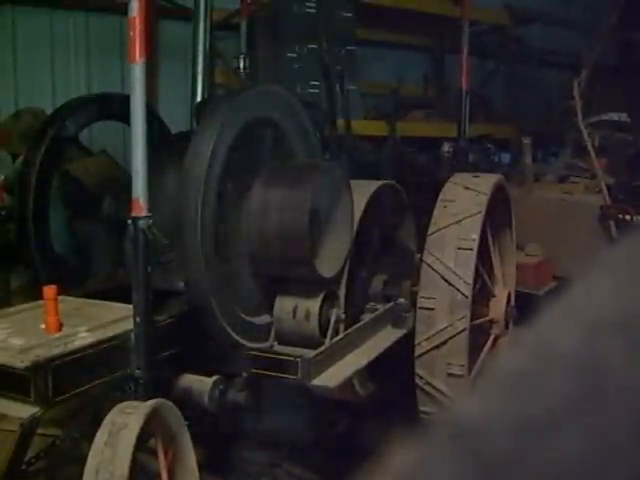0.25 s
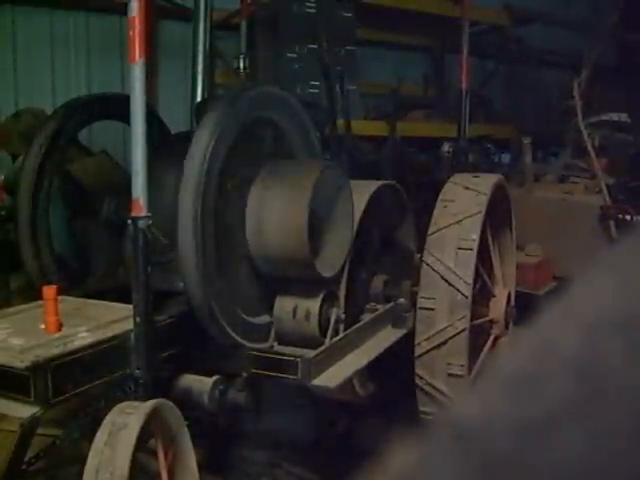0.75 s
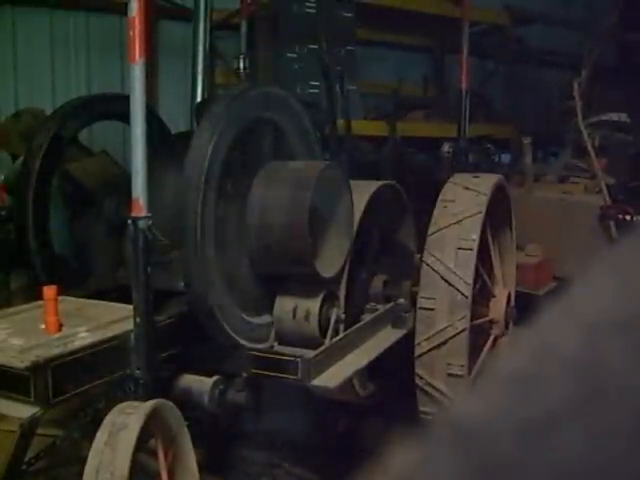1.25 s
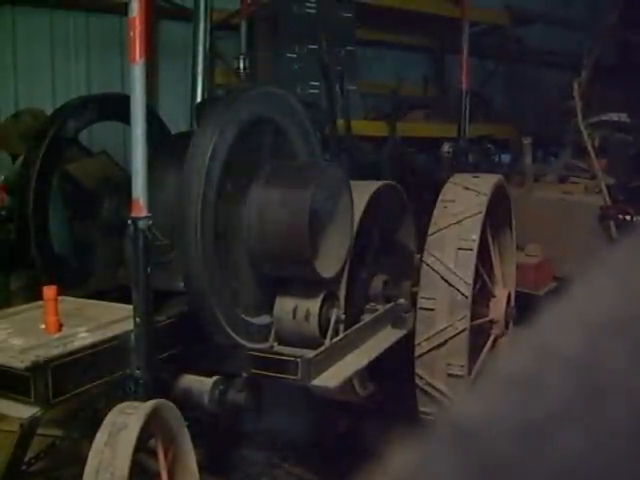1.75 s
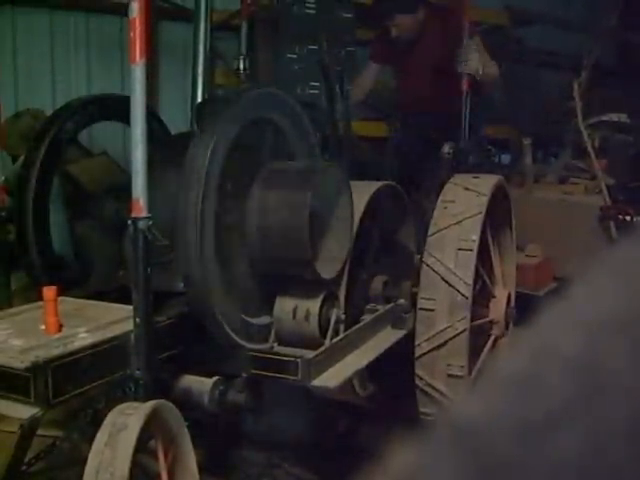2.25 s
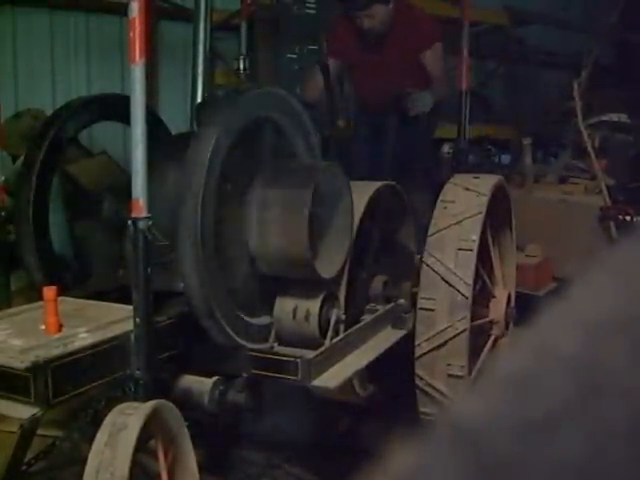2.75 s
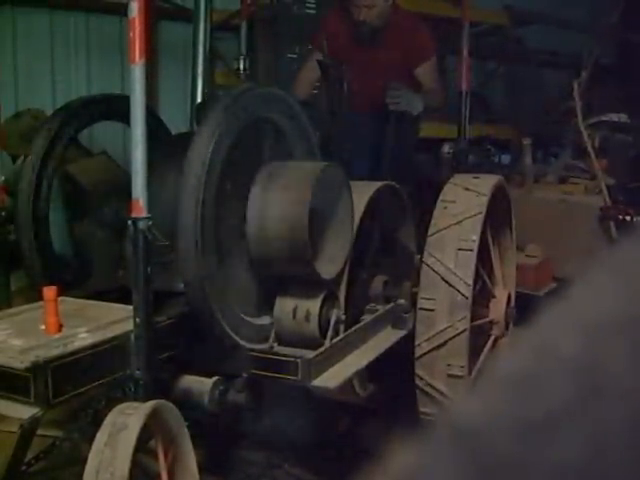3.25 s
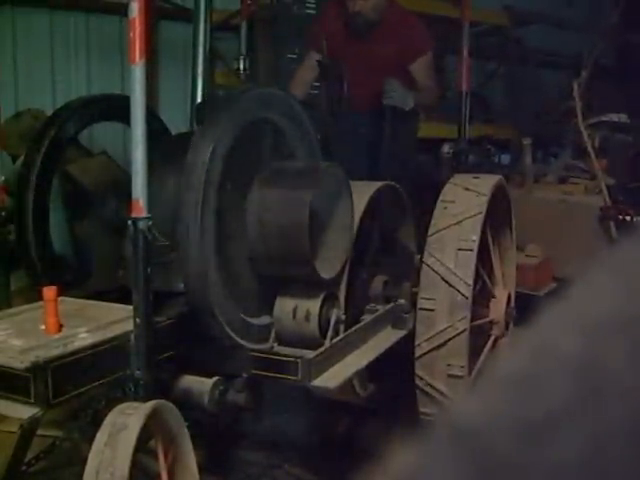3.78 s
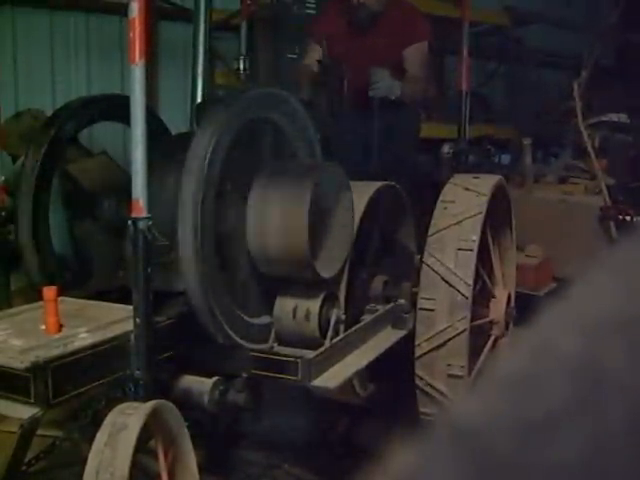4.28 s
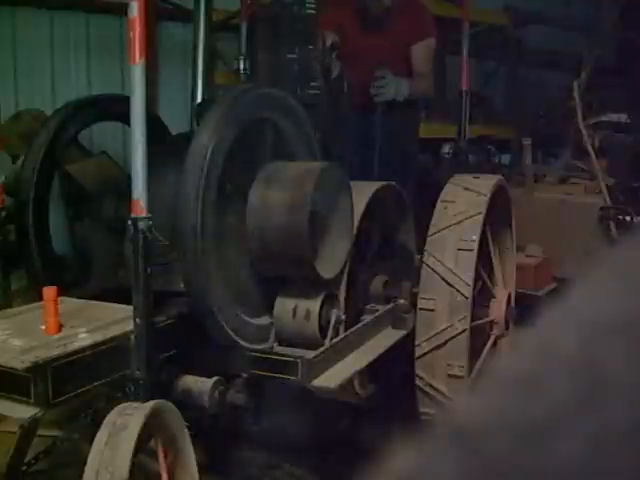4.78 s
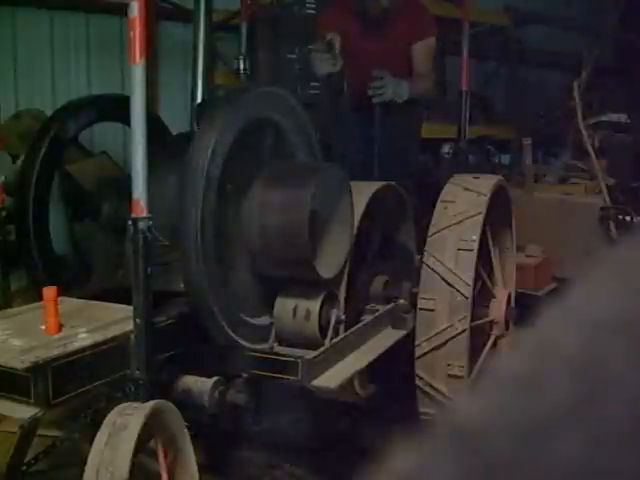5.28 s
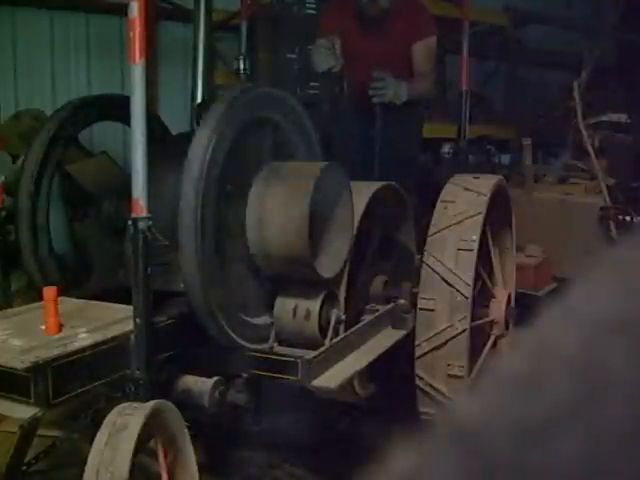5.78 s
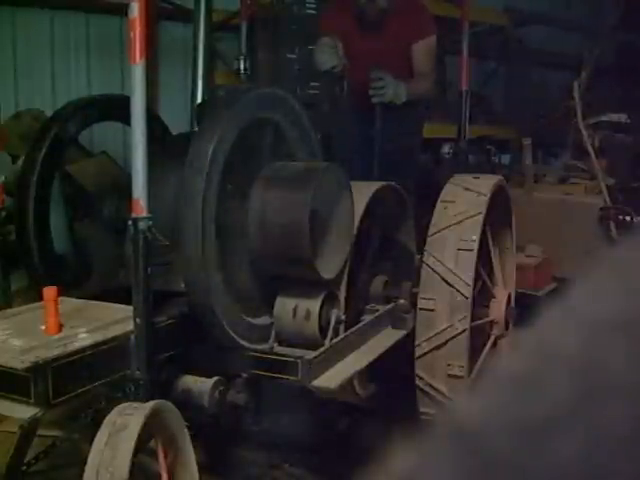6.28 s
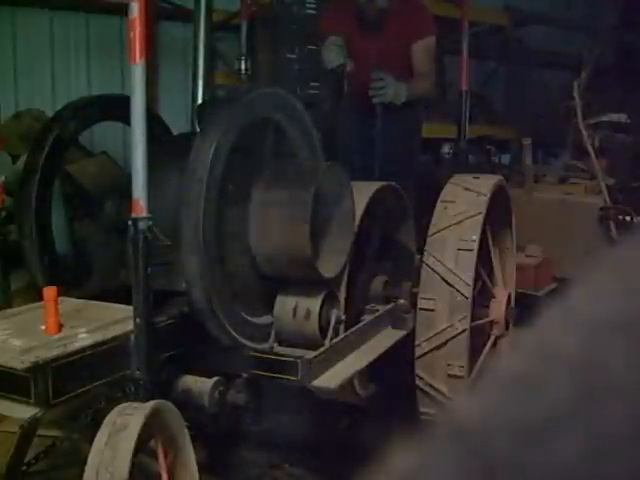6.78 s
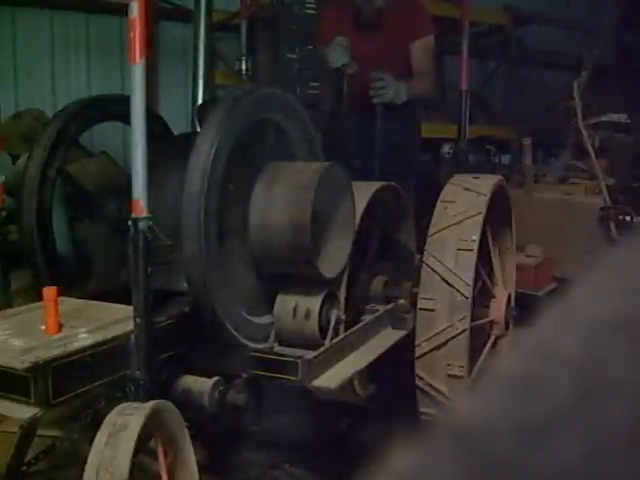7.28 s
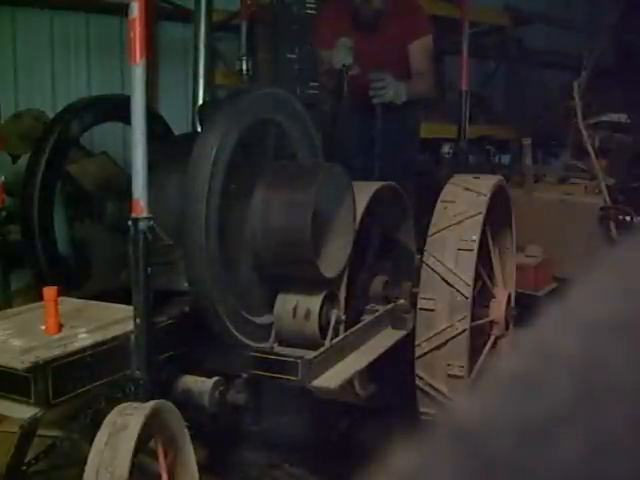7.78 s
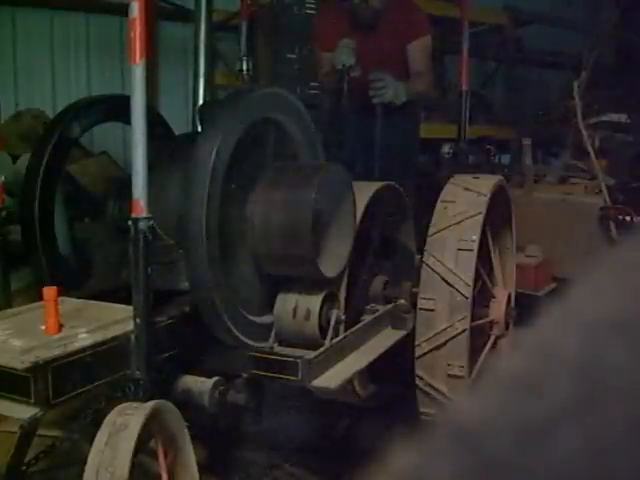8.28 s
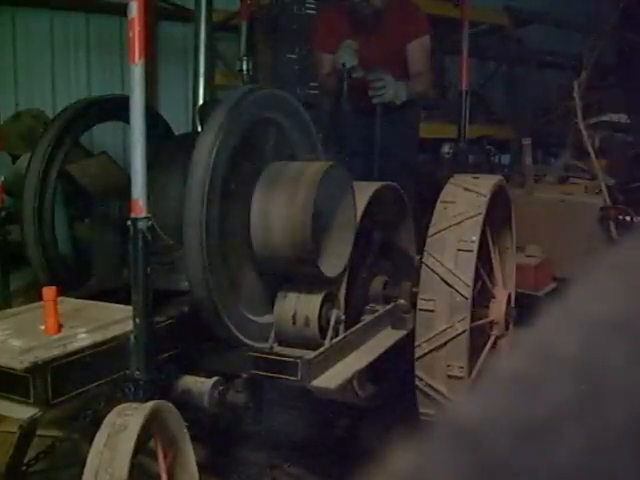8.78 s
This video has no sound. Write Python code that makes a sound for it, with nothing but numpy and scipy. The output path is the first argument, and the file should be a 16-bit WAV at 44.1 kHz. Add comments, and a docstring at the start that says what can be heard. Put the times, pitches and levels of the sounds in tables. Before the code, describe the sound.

Steady idle of an old flywheel engine: a hard, bright exhaust pop rings the metal walls, then a rattling clack, ticking rods, a soft chuff, brief gear groans and another clack just before the next pop. Three extra-hard metal knocks stand out. Continuous bearing rub and light jingle sit underneath. Single fixed mono perspective, close dense reflections, a half-second tail, softened top treble.

```python
"""In a sheet-metal shed an antique single-cylinder engine idles, firing about 80 times a minute.
Each firing is a low thump, a bark and a bright crack: noise bursts that ring the exhaust and the shed.
Between firings filtered noise makes the clack of each turn, linkage ticks, intake chuffs and knocks;
gliding sines with a drifting phase hum as gears, over random jingles, steady rubbing and a faint low hum."""
import sys
import numpy as np
from scipy import signal
from scipy.fft import rfft, irfft
from scipy.io import wavfile
from scipy.ndimage import uniform_filter1d

SR = 44100
rng = np.random.default_rng(int(sys.argv[2]) if len(sys.argv) > 2 else 0)


def master_out(mix):
    """Clip the mix to full scale and print it as 16-bit PCM to the path in sys.argv[1]."""
    frames = np.transpose(np.atleast_2d(mix))
    ceiling = np.clip(frames, -1, 1)
    pcm = np.round(ceiling * 32767).astype(np.int16)
    wavfile.write(sys.argv[1], SR, pcm)


N = 398663
T = np.arange(SR) / SR  # one second

# Firings. Each row: start in seconds, bark level in dB, crack level in dB,
# centre of the lifted bark band in Hz, centre of the lifted crack band in Hz.
FIRINGS = [(0.54, -27, -22, 990, 3640), (1.288, -29.5, -22.5, 1890, 3540), (1.94, -30, -21, 590, 3280),
           (2.685, -24.5, -20, 1130, 3040), (3.455, -27.5, -18.5, 816, 2570),
           (4.235, -27.5, -19.5, 1106, 2980), (5.003, -25.5, -21.5, 1700, 2800),
           (5.765, -25.5, -21, 1368, 2290), (6.524, -27.5, -21, 1420, 2530),
           (7.291, -28, -21.5, 1060, 2260), (8.057, -25.5, -18, 1700, 2805), (8.843, -28, -21, 1890, 3030)]
# Spectrum of struck metal. Each row: frequency in Hz, gain in dB.
METAL_SPECTRUM = [(60, -80), (400, -22.5), (800, -18.5), (1050, -18), (1400, -12.5), (1900, -6.5),
                  (2500, -5), (3100, -1), (3600, -3), (4200, -12.5), (5500, -25), (7500, -33.5),
                  (11000, -41.5)]
# Spectrum of the dry joint and loose fittings. Each row: frequency in Hz, gain in dB.
CHIRP_SPECTRUM = [(300, -30), (1500, -12), (2400, -10.5), (2850, -3.5), (3120, 6), (3450, -10), (4200, -19),
                  (5600, -22), (7500, -38.5), (11000, -43.5)]
# The flywheel turns twice in a cycle. Each entry: clack position as a share of the cycle after the firing.
CLACK_SHARES = (.351, .855)
CYCLE_S, SHORTEST_CYCLE_S = 0.764, 0.747


def amp(db):
    """Decibels to gain."""
    return 10 ** (np.asarray(db) / 20)


def unit(x):
    """Scales to energy 1."""
    return x / np.sqrt(np.sum(x ** 2) + 1e-20)


def read(points, hz):
    """Joins the points by straight lines on a log-frequency axis."""
    f, value = np.transpose(points)
    return np.interp(np.log(hz + 1), np.log(f), value)


def add(mix, start_s, sound):
    """Mixes a sound in at start_s, trimmed to the ends of the mix."""
    start = round(start_s * SR)
    sound = sound[max(-start, 0):]
    part = mix[max(start, 0):][:len(sound)]
    part += sound[:len(part)]


def at_level(x, db, first_ms):
    """Scales x so that its first milliseconds have the given rms level."""
    rms = np.sqrt(np.mean(x[:first_ms * SR // 1000] ** 2) + 1e-20)
    return amp(db) * x / rms


def through(x, response):
    """One second of x heard through an impulse response."""
    return signal.fftconvolve(x, response)[:SR]


def colour(points, size=8192):
    """Minimum-phase impulse response with the given spectrum."""
    hz = abs(np.fft.fftfreq(size, 1 / SR))
    log_gain = np.log(amp(read(points, hz)))
    spectrum = np.exp(np.conj(signal.hilbert(log_gain)))
    return np.fft.ifft(spectrum).real[:size // 2]


def emphasise(x, hz, width_hz, db):
    """Lifts one band by a resonance."""
    b, a = signal.iirpeak(hz, hz / width_hz, fs=SR)
    return x + (amp(db) - 1) * signal.lfilter(b, a, x)


def burst(rise_s, fall_s):
    """A puff of noise that swells and dies exponentially."""
    t = T[:SR // 4]
    envelope = (1 - np.exp(-t / rise_s)) * np.exp(-t / fall_s)
    return unit(rng.standard_normal(len(t)) * envelope)


def ring(modes, t60_s):
    """Dying sines of random phase, one for each mode."""
    total = 0
    for hz, db in modes:
        total = total + amp(db - 60 * T / t60_s) * np.sin(2 * np.pi * (hz * T + rng.random()))
    return unit(total)


def reflections(per_s, early_s):
    """Sparse random reflections from nearby surfaces, fading around early_s."""
    sparse = rng.standard_normal(SR) * (rng.random(SR) < per_s / SR)
    return sparse * np.exp(-(T / early_s) ** 4)


def decay(t60_s):
    """Exponential envelope, down 60 dB at t60_s."""
    return np.exp(-np.log(1000) * T / t60_s)


def shed(direct_db, early_db, early_s):
    """Direct sound, a dense cluster of reflections from nearby walls, and the diffuse tail."""
    # Ring time of the shed. Each row: frequency in Hz, t60 in seconds.
    ring_times = [(60, 0.6), (1200, 0.61), (3500, 0.55), (11000, 0.21)]
    hz = np.fft.rfftfreq(SR, 1 / SR)
    noise = rfft(rng.standard_normal(SR))
    band = read([(row[0], k) for k, row in enumerate(ring_times)], hz)
    tail = np.zeros(SR)
    for k, (_, t60_s) in enumerate(ring_times):
        share = np.maximum(1 - abs(band - k), 0)  # neighbouring bands crossfade
        tail += irfft(noise * share, SR) * decay(t60_s)
    early = reflections(6000, early_s)
    response = unit(tail * (1 - np.exp(-T / 0.0083))) + amp(early_db) * unit(early)
    response[0] += amp(direct_db)
    return unit(response)


def scatter(rise_s, early_db, early_s, t60_s):
    """A blow or a jet of gas, scattered afresh by nearby surfaces and then by the whole shed."""
    near = reflections(8000, early_s)
    far = rng.standard_normal(SR) * decay(t60_s)
    return unit((amp(early_db) * unit(near) + unit(far)) * (1 - np.exp(-T / rise_s)))


def cycles():
    """(start s, length s, next firing s) of each cycle, which ends at the next firing."""
    fired = [row[0] for row in FIRINGS]
    edges = [fired[0] - CYCLE_S] + fired + [fired[-1] + CYCLE_S]
    return [(s, max(end - s, SHORTEST_CYCLE_S), end) for s, end in zip(edges, edges[1:])]


def in_each_cycle(delay_s, share=0):
    """The moments at which the cam passes a share plus a delay, which stretches with the cycle."""
    moments = [(s + length * (share + delay_s / CYCLE_S), end) for s, length, end in cycles()]
    return [s for s, end in moments if s < end]  # sounds due after the next firing are left out


def in_each_turn(delay_s):
    """The moments a given delay after the clack, in every turn of the flywheel."""
    return [s for share in CLACK_SHARES for s in in_each_cycle(delay_s, share)]


def exhaust():
    """The valve opens: the same pressure step each time, then a jet of gas that is never twice alike."""
    # Ringing modes of the exhaust. Each row: frequency in Hz, relative level in dB.
    pipe_modes = [(662, -4), (780, -6), (855, -5), (964, -3), (1017, -4), (1105, 2), (1179, -1), (1308, -1),
                  (1545, -3), (1680, -2), (1801, 0), (2138, -3), (2260, -2), (2485, 0), (2659, 0),
                  (2805, -3), (2909, -1), (3055, -2), (3435, -2), (3533, -3)]
    # Spectra of thump, bark and crack. Each row: frequency in Hz, gain in dB.
    thump_spectrum = [(15, -24), (36, 1.5), (55, -8), (80, -5.5), (110, -6), (150, -0.5), (205, 4),
                      (300, 2), (500, -3), (1000, -18), (3000, -76)]
    bark_spectrum = [(60, -32), (200, -25), (450, -7), (650, -0.5), (850, -1.5), (1150, -0.5), (1500, -1),
                     (1900, -9.5), (2600, -29), (6000, -40)]
    crack_spectrum = [(200, -31.5), (1200, -32.5), (1900, -6), (2500, -4), (3000, 0.5), (3450, -3),
                      (4000, -8), (5000, -13.5), (6300, -25.5), (7500, -33), (11000, -37)]
    out, low, high = np.zeros(N), colour(bark_spectrum), colour(crack_spectrum)
    thump = through(colour(thump_spectrum), shed(direct_db=-2.5, early_db=-3, early_s=0.036))
    pipe = ring(pipe_modes, t60_s=0.39) * (1 - np.exp(-T / 0.0055))
    no_treble = signal.butter(6, 3600, fs=SR, output="sos")
    trim_db = -0.1  # bark and crack
    usual_db = np.mean([row[1] for row in FIRINGS])
    for s, bark_db, crack_db, bark_hz, crack_hz in FIRINGS:
        thump_db = -40.5 + 0.5 * (bark_db - usual_db)
        add(out, s, at_level(thump, thump_db, first_ms=100))
        # each bark is fresh noise with its own emphasised band
        space = shed(direct_db=-8, early_db=2, early_s=0.053) + amp(-12.5) * pipe
        gust = unit(through(burst(rise_s=0.0017, fall_s=0.0079), space))
        roar = scatter(rise_s=0.006, early_db=1, early_s=0.045, t60_s=0.55) + amp(-10.5) * pipe
        bark = emphasise(through(gust + 0.35 * roar, low), bark_hz, width_hz=220, db=4.5)
        add(out, s + 0.002007, at_level(bark, bark_db + trim_db, first_ms=100))
        # crack: the jet hisses over the whole treble and rings the metal lower down
        space = shed(direct_db=-5, early_db=0, early_s=0.056) + amp(-14) * pipe
        rung = unit(through(burst(rise_s=0.00035, fall_s=0.01), space))
        ringing = signal.sosfilt(no_treble, rung)
        jet = scatter(rise_s=0.003, early_db=3.5, early_s=0.07, t60_s=1.0)
        crack = emphasise(through(jet + 1.8 * ringing, high), crack_hz, width_hz=250, db=4)
        add(out, s + 0.0055, at_level(crack, crack_db + trim_db, first_ms=100))
    return out


def clacks():
    """Slack is taken up once a revolution: the same blow rings the iron, with a little loose rattle."""
    # Ringing modes of the iron works. Each row: frequency in Hz, relative level in dB.
    iron_modes = [(1060, -2), (1300, -3), (1480, 2), (1927, -3), (2035, -3), (2487, -3), (3052, 0),
                  (3435, -4), (3704, -6), (4371, -8)]
    mean_db, spread_db = -28.5, 0.37
    out, metal = np.zeros(N), colour(METAL_SPECTRUM)
    iron = ring(iron_modes, t60_s=0.5)
    body = shed(direct_db=-5.5, early_db=3.5, early_s=0.038) + amp(-11.5) * iron
    for s in in_each_turn(0):
        rattle = amp(-3) * scatter(rise_s=0.0018, early_db=2, early_s=0.031, t60_s=0.36)
        level_db = mean_db + spread_db * rng.standard_normal()
        add(out, s, at_level(through(body + rattle, metal), level_db, first_ms=50))
    return out


def knocks():
    """Now and then metal meets metal hard: a snap of a few milliseconds and its reflections."""
    # Hard knocks. Each row: start in seconds, level in dB.
    hard_knocks = [(1.95, -21), (5.355, -26.5), (8.061, -24)]
    out, metal = np.zeros(N), colour(METAL_SPECTRUM)
    for s, db in hard_knocks:
        knock = amp(4) * scatter(rise_s=0.0016, early_db=3, early_s=0.025, t60_s=0.3)
        add(knock, 0, burst(rise_s=0.00024, fall_s=0.00083))
        knock = emphasise(through(knock, metal), 3130, width_hz=320, db=7)
        add(out, s, at_level(knock, db, first_ms=4))
    return out


def linkage():
    """A dry joint chirps soon after each clack; rods and rocker tap at fixed points of the turn."""
    # Taps in every turn. Each row: delay after the clack in seconds at CYCLE_S, mean level in dB.
    taps = [(.056, -41), (0.157, -52.5), (.198, -41.5), (.306, -36)]
    # Spectrum of a tapped rod. Each row: frequency in Hz, gain in dB.
    tap_spectrum = [(200, -38), (1200, -15), (2000, -8), (2500, -2.5), (3050, 0), (3600, -3), (4300, -13),
                    (5700, -22.5), (7500, -34.5), (11000, -36.5)]
    chirp_delay_s, chirp_db, chirp_spread_db = 0.097, -35.5, 1.9
    out, joint, rod = np.zeros(N), colour(CHIRP_SPECTRUM), colour(tap_spectrum)
    for s in in_each_turn(chirp_delay_s):
        chirp = through(scatter(rise_s=0.0047, early_db=-3, early_s=0.03, t60_s=0.13), joint)
        level_db = chirp_db + chirp_spread_db * rng.standard_normal()
        add(out, s, at_level(chirp, level_db, first_ms=40))
    for delay_s, db in taps:
        for s in in_each_turn(delay_s):
            tap = through(scatter(rise_s=0.0011, early_db=3, early_s=0.02, t60_s=0.44), rod)
            add(out, s, at_level(tap, db + rng.uniform(-1, 1), first_ms=30))
    return out


def intake():
    """A soft, low chuff of coloured noise about half a cycle after each firing."""
    # Spectrum of the chuff. Each row: frequency in Hz, gain in dB.
    chuff_spectrum = [(15, -2), (36, 0), (80, -11), (200, 2), (420, 1), (660, 3), (950, 3.5), (1500, -17),
                      (4000, -59)]
    out, low = np.zeros(N), colour(chuff_spectrum)
    chuff = through(low, shed(direct_db=-5, early_db=-1.5, early_s=0.036))
    for s in in_each_cycle(0.376):
        air = through(low, scatter(rise_s=0.0017, early_db=-3, early_s=0.23, t60_s=0.91))
        add(out, s, at_level(chuff + amp(-6) * air, -49, first_ms=100))
    return out


def hums():
    """Short fuzzy tones glide, swell and fade as the load on the gears changes round the cycle."""
    # Gear and intake tones of every cycle. Each row: delay after the firing in seconds at CYCLE_S,
    # length in seconds, start frequency in Hz, end frequency in Hz, width in Hz,
    # level in dB ahead of random spread, swell and shed.
    tones = [(.209, .074, 290, 268, 60, -56), (.371, 0.034, 520, 640, 40, -48.5),
             (.384, 0.073, 425, 400, 60, -50), (.433, 0.042, 279, 255, 40, -48.5),
             (.507, 0.1248, 707, 767, 54, -52.5), (.51, 0.13, 865, 845, 65, -53),
             (.593, .055, 385, 440, 47, -53), (.592, 0.025, 253, 262, 42, -53.5),
             (.52, .1, 3892, 3830, 200, -50.5), (.514, 0.1, 5150, 5200, 300, -63)]
    out = np.zeros(N)
    for delay_s, length_s, start_hz, end_hz, width_hz, db in tones:
        t = T[:int(length_s * SR)]
        turns = np.cumsum(np.linspace(start_hz, end_hz, len(t))) / SR
        swell = np.sin(np.pi * t / length_s)
        for s in in_each_cycle(delay_s):
            # a random walk of the phase widens the tone
            walk = np.cumsum(rng.standard_normal(SR // 4))[:len(t)]
            drift = walk * np.sqrt(2 * np.pi * width_hz / SR)
            tone = np.sin(2 * np.pi * turns + uniform_filter1d(drift, SR // 1000))
            gain = amp(db + rng.uniform(-3.0, 2.6)) * np.sqrt(2)
            add(out, s, gain * tone * swell)
    return signal.fftconvolve(out, shed(direct_db=14, early_db=5.5, early_s=0.023))[:N]


def loose_parts():
    """Loose fittings jingle at random, about 40 hits a second, mostly faintly."""
    sizes = amp(4 * np.minimum(rng.exponential(1, N), 3)) * rng.choice([-1, 1], N)
    hits = sizes * (rng.random(N) < 40 / SR)
    body = through(colour(CHIRP_SPECTRUM), shed(direct_db=-11, early_db=12.5, early_s=0.012))
    return amp(-47) * unit(signal.fftconvolve(hits, body)[:N]) * np.sqrt(N)


def running():
    """Steady rubbing of bearings and gears: coloured noise of slightly uneven level."""
    # Spectrum of the rubbing. Each row: frequency in Hz, gain in dB.
    rubbing_spectrum = [(15, -69), (25, -24), (81, -36.5), (254, -9), (327, -42), (433, -8), (480, -12.5),
                        (862, -10), (1170, -10.5), (1630, -11), (2100, -5), (2330, -8.5), (3000, 3.5),
                        (4630, -29), (11000, -43), (14300, -83), (22000, -120)]
    gain = amp(read(rubbing_spectrum, np.fft.rfftfreq(N, 1 / SR)))
    noise = irfft(rfft(rng.standard_normal(N)) * gain, N)
    flutter = unit(uniform_filter1d(rng.standard_normal(N), SR // 60)) * np.sqrt(N)
    level_db = -42 + 2.24 * flutter
    return amp(level_db) * unit(noise) * np.sqrt(N)


def drone():
    """A faint, steady low hum in the shed: one sine."""
    return amp(-68.5) * np.sin(2 * np.pi * 125.5 * np.arange(N) / SR)


def scene():
    """All parts of the engine and the drone, heard from one spot."""
    works = clacks() + knocks() + linkage() + loose_parts() + hums() + running()
    return (exhaust() + intake() + works + drone())[None]


def record(dry):
    """Band limit: a linear-phase low-pass removes the top treble."""
    edge_hz = 11150
    low_pass = signal.firwin(301, edge_hz, window=("kaiser", 9), fs=SR)
    return signal.oaconvolve(dry, low_pass[None], "same")


dry = scene()
out = record(dry)
master_out(out)
```